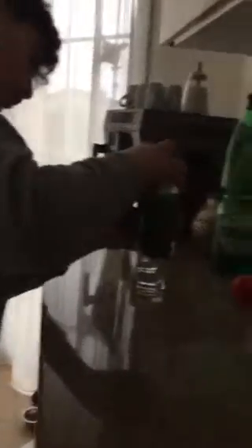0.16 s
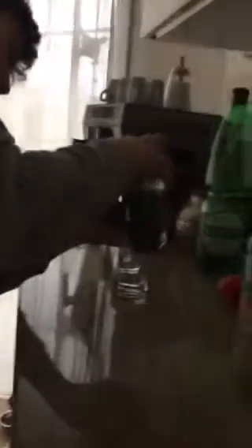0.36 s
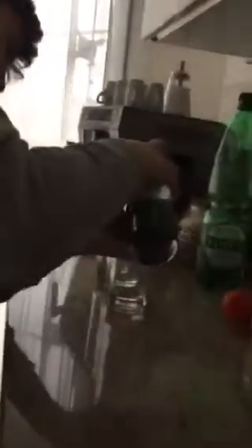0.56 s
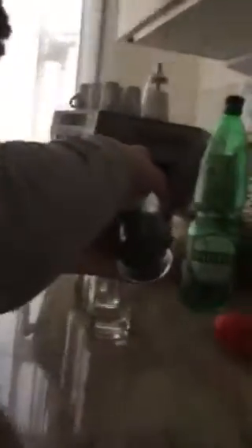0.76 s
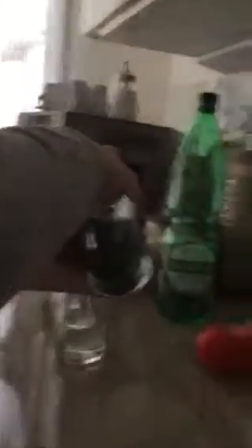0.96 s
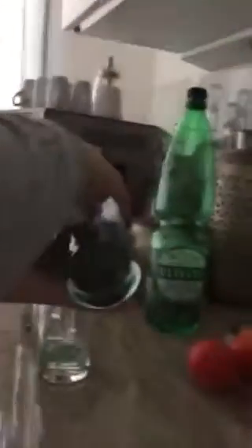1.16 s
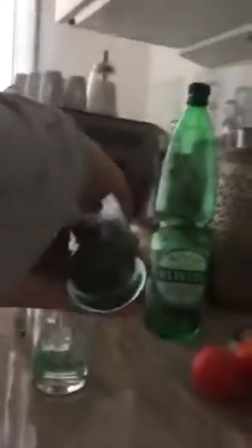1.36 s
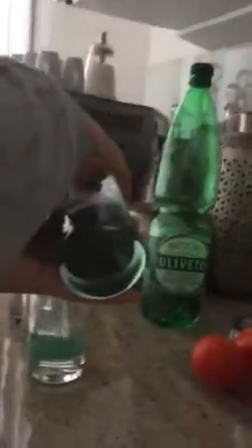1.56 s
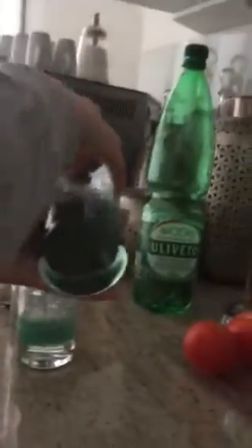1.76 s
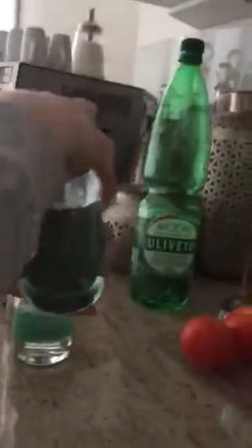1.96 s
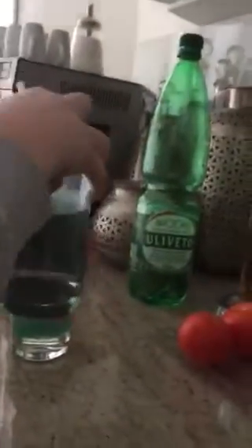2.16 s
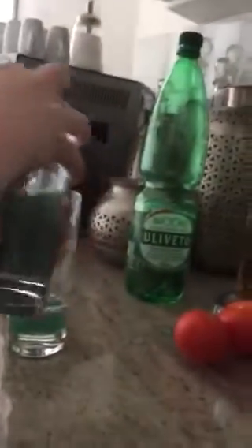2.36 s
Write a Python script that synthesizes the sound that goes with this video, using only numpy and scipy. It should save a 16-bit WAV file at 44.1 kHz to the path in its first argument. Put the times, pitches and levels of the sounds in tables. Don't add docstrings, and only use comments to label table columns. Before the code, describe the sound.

Water pouring into a glass is the main sound, close to a phone in a small reflective kitchen. Faint hush opens; a dull knock with a low thud lands at 0.2 seconds, with small bumps after, a lighter knock near 0.5. Pouring starts about 1.2 with bright bubbles and patter, swells into hollow ringing gulps from 1.8, stops near 2.1; stray drips and faint sleeve rustle end it.

```python
import sys
import numpy as np
from scipy import signal
from scipy.fft import rfft, irfft
from scipy.io import wavfile
from scipy.ndimage import uniform_filter1d

SR = 44100
rng = np.random.default_rng(int(sys.argv[2]) if len(sys.argv) > 2 else 0)


def magnitude_from_level(level_db):
    exponent = np.asarray(level_db, float) / 20
    return 10 ** exponent


def wav_record(signal):
    frames = np.transpose(np.atleast_2d(signal))
    bounded = np.clip(frames, -1, 1)
    quanta = np.round(bounded * 32767).astype(np.int16)
    wavfile.write(sys.argv[1], SR, quanta)


N = 105840
T = np.arange(N) / SR

# (time [s], level [dB], pitch [Hz])
GULPS = [(1.278, -64, 600), (1.347, -63.5, 610), (1.381, -56, 587), (1.445, -63, 626), (1.673, -56.5, 650),
         (1.699, -51.5, 890), (1.81, -42.5, 691), (1.842, -44.5, 880), (1.903, -34, 871),
         (1.931, -43.5, 780), (1.977, -34.5, 861), (2.016, -51, 920), (2.044, -38, 699), (2.071, -34, 628),
         (1.813, -41.5, 908), (1.875, -53, 770), (1.913, -43.5, 720), (1.983, -37, 853),
         (1.996, -39.5, 770), (2.031, -43, 883), (2.084, -38, 709), (2.0915, -39, 660), (1.49, -68, 597),
         (1.53, -68, 640), (1.25, -69, 620)]
# (time [s], level [dB], pitch [Hz])
BUBBLES = [(1.2003, -52.5, 1953), (1.2461, -51, 1410), (1.3476, -60, 1340), (1.4454, -42.5, 1756),
           (1.4964, -44.5, 1878), (1.555, -55, 2140), (1.5747, -48, 1824), (1.6221, -50, 1837),
           (1.6626, -56, 1805), (1.6786, -47, 1797), (1.7041, -43, 1808), (1.784, -45, 1955),
           (1.91, -48, 1840), (1.9745, -54, 2024), (1.994, -39.5, 2038), (2.033, -52, 1934),
           (2.0702, -44, 1930), (1.263, -50.5, 1574), (1.282, -52.5, 1740), (1.313, -56, 1760),
           (1.358, -60, 1395), (1.384, -56, 1367), (1.397, -63.5, 1235), (1.415, -57, 1900),
           (1.455, -48, 1736), (1.464, -48.5, 1746), (1.47, -59, 1350), (1.495, -59, 1330),
           (1.505, -45, 1930), (1.66, -55.5, 1285), (1.7, -57, 2100), (1.844, -54.5, 1060),
           (1.845, -49, 1473), (1.879, -49, 1167), (1.929, -59.5, 1240), (1.974, -58, 1350),
           (1.997, -52.5, 1220), (2.02, -55, 1550), (2.05, -54, 1290), (2.076, -60, 1240)]
# (time [s], level [dB], pitch [Hz])
BEADS = [(1.1926, -45.5, 4050), (1.2217, -47.5, 4070), (1.2339, -38.5, 3650), (1.278, -50.5, 2770),
         (1.3218, -51, 2914), (1.3753, -54, 2820), (1.445, -42.5, 2684), (1.5561, -43, 3042),
         (1.5732, -44, 3490), (1.6552, -48, 3570), (1.7016, -48, 3050), (1.736, -51, 3100),
         (1.753, -45, 3264), (1.9183, -43.5, 3530), (1.9567, -45.5, 5010), (2.014, -42.5, 3683),
         (2.0597, -49.5, 3200), (2.0848, -43, 3280), (1.239, -50, 3705), (1.243, -46, 4020),
         (1.319, -49.5, 3400), (1.354, -55, 2790), (1.378, -53, 2350), (1.452, -49, 2500),
         (1.535, -54.5, 3570), (1.57, -49.5, 2560), (1.605, -51, 4170), (1.615, -50, 3110),
         (1.795, -51, 4300), (2.086, -52, 4050)]
# (time [s], level [dB], pitch
# [Hz])
SPECKS = [(1.1944, -57, 5800), (1.2097, -45.5, 6120), (1.2384, -42.5, 11150), (1.2521, -40, 5580),
          (1.2907, -49, 7300), (1.4487, -55, 5500), (1.6027, -46.5, 5460), (1.6554, -55.5, 10800),
          (1.7835, -52, 9500), (1.7853, -47.5, 11860), (1.816, -45, 6170), (1.9023, -50.5, 5630),
          (1.959, -59, 5100), (1.985, -49, 5550), (2.0047, -43, 5730), (2.0958, -49.5, 5150),
          (1.226, -50, 5500), (1.319, -53, 5630), (1.373, -56, 5570), (1.393, -60, 4970),
          (1.413, -57.5, 5670), (1.491, -54, 4970), (1.5625, -53.5, 4850), (1.618, -60, 5230),
          (1.628, -53, 4950), (1.734, -56.5, 5430), (1.775, -48.5, 6100), (1.289, -50, 8340),
          (1.083, -56, 6370), (1.601, -49, 7500), (2.288, -69, 7150), (2.307, -63.5, 4110),
          (2.331, -65, 7020), (2.383, -62, 7030), (2.383, -61, 4150)]
# (60 dB fade [cycles], rise [cycles], upward glide [share], splash level [dB])
BUBBLE_SIZES = [
    (13, 1.6, .2, -27),
    (26, 7, .07, -8),
    (30, 9, .06, -5),
    (28, 12, .05, -3),
]
# (time [s], level [dB])
FLOW = [(1.192, -58), (1.21, -75.5), (1.4, -59), (1.53, -64.5), (1.58, -60), (1.75, -59.5), (1.85, -53.5),
        (2.07, -56), (2.11, -66.5)]
# (frequency [Hz], level [dB])
STREAM_COLOUR = [(800, -12.5), (1900, 2.5), (2800, -5.5), (3600, -4), (5600, -10.5), (8500, -18.5),
                 (12000, -25.5)]
SPRAY_TIMES = [1.208, 1.245, 1.35, 1.452, 1.526, 1.567, 1.65, 1.758, 1.775, 1.832, 2.003, 2.008]
# (level [dB], centre [Hz], length [s])
SPRAY = [(-63.5, 9200, 0.0079), (-63, 8100, 0.013), (-69.5, 11300, 0.012), (-73, 16000, 0.012),
         (-69, 10500, 0.0067), (-61.5, 12200, 0.0078), (-60, 9900, 0.0093), (-65, 16000, 0.019),
         (-59.5, 9000, 0.011), (-68, 12600, 0.011), (-53.5, 8500, 0.016), (-56, 12400, 0.0099)]
# (frequency [Hz], level [dB], 60 dB decay [s])
GLASS = [
    (612, 6, .36),
    (684, 8, .55),
    (760, -3, .2),
    (1860, 2, .1),
    (3600, -2, .06),
    (5600, -4, .04),
]
KNOCK_TIMES = [.198, .201, .2, .203, .205, .4855, .4865, .487, .49, .5, .824, .8245, 1.015, 1.03, 1.37,
               1.375, 1.555, 1.815, 1.925]
# (level [dB], centre [Hz], 60 dB decay [s])
KNOCKS = [(-52, 1990, 0.1), (-52.5, 3070, .08), (-43, 384, 0.054), (-67, 11000, .14), (-43, 245, 0.42),
          (-42.5, 1400, 0.02), (-49.5, 910, 0.12), (-56.5, 2150, 0.063), (-55.5, 304, 0.11),
          (-57.5, 960, 0.23), (-56, 323, 0.06), (-62.5, 1030, 0.15), (-71, 11000, 0.21),
          (-70.5, 4550, 0.46), (-56.5, 209, 0.11), (-56.5, 160, 0.25), (-55, 285, 0.35), (-61, 383, 0.27),
          (-58.5, 214, 0.16)]
# (time [s], level [dB], pitch [Hz], length
# [s])
THUDS = [(0.198, -40.5, 230, 0.018), (0.212, -26.5, 90.7, 0.046), (.225, -33.5, 163.5, 0.046),
         (0.269, -35.5, 106, 0.028), (0.31, -37.5, 94, 0.037), (0.391, -46, 91.8, 0.054),
         (0.305, -52.5, 277.3, 0.048), (0.38, -61, 261.8, 0.1), (0.524, -48.5, 110, 0.026),
         (0.819, -60.5, 58, 0.043), (1.031, -52, 87.2, 0.057), (1.387, -45.5, 117.4, 0.064),
         (1.524, -51.5, 66, 0.031), (1.57, -46, 79, 0.059), (1.622, -47, 81.6, 0.04),
         (1.623, -56.5, 296, 0.066), (1.66, -53, 78, 0.041), (1.847, -60.5, 320, 0.047),
         (0.199, -37.5, 60, 0.034), (0.242, -45, 49, 0.046), (1.369, -53.5, 95, 0.025),
         (1.84, -60, 124, 0.049), (1.93, -61.5, 142, 0.034)]
# (time [s], level [dB])
RUSTLE = [(0, -81), (.19, -75), (.8, -111), (.9, -71.5), (1.06, -76), (1.15, -84), (1.25, -105),
          (2.27, -87), (2.31, -76.5), (2.37, -68), (2.4, -62)]
# (frequency [Hz], density [dB per Hz])
HUSH = [(18, -32), (30, 3), (168, -7), (202, -5.5), (505, -15.5), (639, -14), (970, -13.5), (15500, -27.5)]

TOP_HZ = 15450


def unit(x):
    return x / np.sqrt(np.mean(x ** 2))


def add(out, start, x):
    i = int(start * SR)
    out[i:i + len(x)] += x[:max(N - i, 0)]


def band(x, hz, width_hz):
    b, a = signal.iirpeak(min(hz, .45 * SR), max(hz / width_hz, .3), SR)
    return signal.lfilter(b, a, x)


def noise_band(length, hz, width_hz, second_width_hz):
    once = band(rng.standard_normal(length), hz, width_hz)
    return unit(band(once, hz, second_width_hz))


def spectrum_db(points, hz):
    p = np.array(points)
    return np.interp(np.log(hz), np.log(p[:, 0]), p[:, 1])


def curve(rows):
    p = np.array(rows)
    return magnitude_from_level(np.interp(T, p[:, 0], p[:, 1], -140, -140))


def walk(rate_hz):
    k = int(SR / rate_hz)
    smooth = uniform_filter1d(rng.standard_normal(N), k)
    return unit(uniform_filter1d(smooth, k))


def fade(t, t60):
    return 1000 ** (-t / t60)


def water():
    out = stream()
    size_tables = (GULPS, BUBBLES, BEADS, SPECKS)
    for rows, (cycles, rise, glide, splash_db) in zip(size_tables, BUBBLE_SIZES):
        for start, level_db, hz in rows:
            add(out, start, magnitude_from_level(level_db) * bubble(hz, cycles, rise, glide))
            add(out, start, magnitude_from_level(level_db + splash_db) * splash(hz))
    spray(out)
    return out + glass(out)


def bubble(hz, cycles, rise, glide):
    c = np.arange(int((cycles + rise) * SR / hz) + 2) * hz / SR
    swell = np.sin(np.pi / 2 * np.minimum(c / rise, 1)) ** 2
    decay = 1000 ** (-(np.maximum(c - rise, 0) / cycles) ** 1.92)
    return swell * decay * np.sin(2 * np.pi * c * (1 - glide / 2 + glide * c / cycles))


def splash(hz):
    c = np.arange(8192) * hz / SR
    burst = noise_band(len(c), hz, 0.3 * hz, 0.3 * hz)
    return burst * np.minimum(c / 6, 1) * fade(c, 90)


def stream():
    rate, scatter_db = 150, 5.5
    cluster_s, cluster_octaves = 0.011, 0.364
    cycles_at_2k, rise_cycles, glide = 23.5, 2.55, .1
    low_hz, high_hz = STREAM_COLOUR[0][0], STREAM_COLOUR[-1][0]
    out = np.zeros(N)
    for k, (late, size, strong, *beads) in enumerate(rng.random((150, 19))):
        centre_hz = low_hz * (high_hz / low_hz) ** ((size + k % 3) / 3)
        for when, detune in np.reshape(beads, (-1, 2)):
            hz = min(centre_hz * 2 ** (cluster_octaves * (2 * detune - 1)), TOP_HZ)
            db = spectrum_db(STREAM_COLOUR, hz) + 10 * np.log10(hz)
            db -= scatter_db * np.log(1 - .95 * strong)
            start = FLOW[0][0] + (k + 2 * late) / rate - cluster_s * np.log(1 - .98 * when)
            cycles = cycles_at_2k * (hz / 2000) ** 0.48
            add(out, start, magnitude_from_level(db) * bubble(hz, cycles, rise_cycles, glide))
    wash = np.zeros(N)
    for hz, db in STREAM_COLOUR:
        flicker = magnitude_from_level(db + 5 * walk(50))
        wash += flicker * unit(band(rng.standard_normal(N), hz, .22 * hz)) * np.sqrt(hz / 2000)
    patter = out / np.std(out[out != 0])
    return (patter * magnitude_from_level(-3.5) + magnitude_from_level(-11) * unit(wash)) * curve(FLOW)


def spray(out):
    grain = magnitude_from_level(4 * walk(600))
    for start, (db, hz, length) in zip(SPRAY_TIMES, SPRAY):
        puff = noise_band(4096, hz, .38 * hz, .38 * hz)[:int(2 * length * SR)]
        swell = np.sin(np.pi * np.linspace(0, 1, len(puff)) ** .8) ** 2
        add(out, start, magnitude_from_level(db) * puff * grain[int(start * SR):][:len(puff)] * swell)


def glass(x):
    return sum(magnitude_from_level(db) * band(x, hz, np.log(1000) / np.pi / t60) for hz, db, t60 in GLASS)


def knocks():
    out, t = np.zeros(N), T[:SR // 2]
    for start, (db, hz, t60) in zip(KNOCK_TIMES, KNOCKS):
        burst = noise_band(len(t), hz, 0.5 * hz, 0.52 * hz)
        add(out, start, magnitude_from_level(db) * burst * fade(t, t60) * np.minimum(t / .004, 1))
    return out


def thuds():
    out, t = np.zeros(N), T[:SR]
    for start, db, hz, length in THUDS:
        u = T[:int(length * SR)]
        push = np.sin(np.pi * (u / length) ** .8)
        add(out, start, magnitude_from_level(db) * push * np.sin(2 * np.pi * hz * u))
    boom = rng.standard_normal(SR) * fade(t, .75) * np.minimum(t / 0.023, 1)
    boom /= np.sqrt(np.sum(boom ** 2))
    return out + magnitude_from_level(-11) * signal.fftconvolve(out, boom)[:N]


def rustle():
    cloth = noise_band(N, 1970, 2070, 2070)
    return cloth * magnitude_from_level(2.5 * walk(60)) * curve(RUSTLE)


def room(x):
    low_t60, top_t60, gap_s = 0.24, 0.1, 0.00085
    t = T[:SR // 2]
    noise = rng.standard_normal(len(t))
    low = signal.lfilter(*signal.butter(1, 2200, fs=SR), noise)
    low_tail = low * fade(t, low_t60)
    tail = low_tail + (noise - low) * fade(t, top_t60)
    tail *= np.clip(t / gap_s - .5, 0, 1)
    tail *= 0.39 / np.sqrt(np.sum(low_tail ** 2))
    return magnitude_from_level(-1) * signal.fftconvolve(x, tail)[:N]


def hush():
    hz = np.maximum(np.fft.rfftfreq(N, 1 / SR), 1)
    colour = magnitude_from_level(spectrum_db(HUSH, hz)) / (1 + (33 / hz) ** 4)
    air = unit(irfft(rfft(rng.standard_normal(N)) * colour, N))
    low = band(air, 91, 170)
    return magnitude_from_level(-70) * (air + low * (magnitude_from_level(3.0 * walk(8)) - 1))


def scene():
    near = water() + knocks()
    return (near + room(near) + thuds() + rustle() + hush())[None]


def low_pass(x):
    return signal.sosfilt(signal.butter(12, 15710, fs=SR, output="sos"), x)


def record(dry):
    bass_cut = signal.butter(3, 45, "high", fs=SR, output="sos")
    top_cut = signal.ellip(8, .2, 70, TOP_HZ, fs=SR, output="sos")
    mix = signal.sosfilt(top_cut, signal.sosfilt(bass_cut, dry))
    return low_pass(mix)


dry = scene()
out = record(dry)
wav_record(out)
```